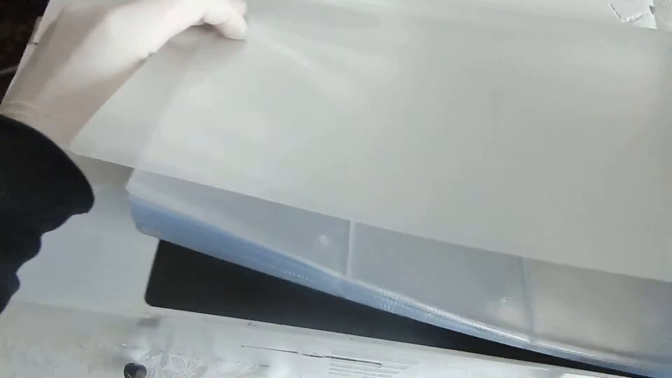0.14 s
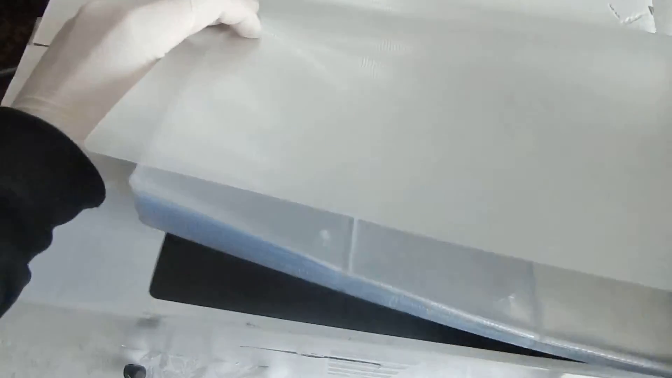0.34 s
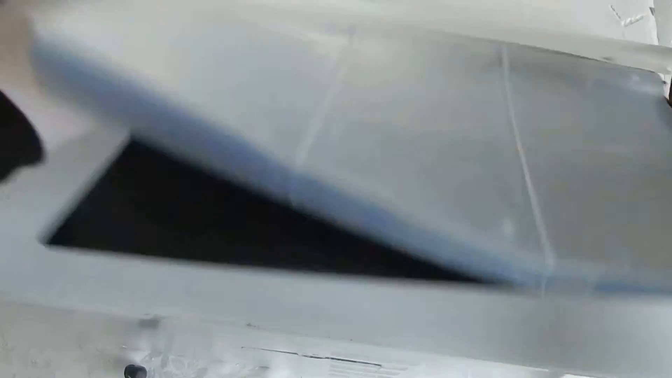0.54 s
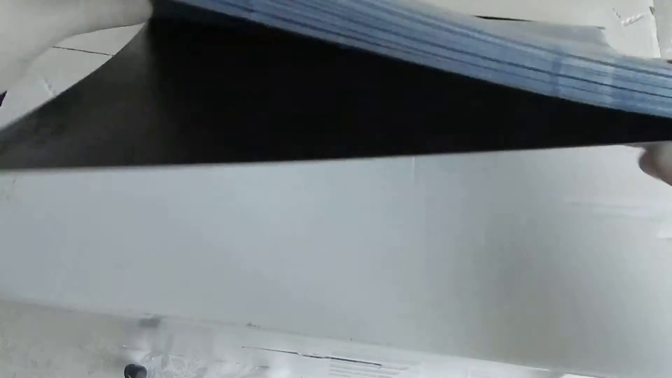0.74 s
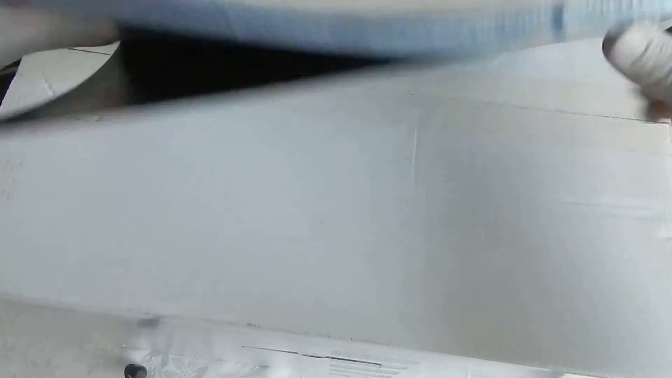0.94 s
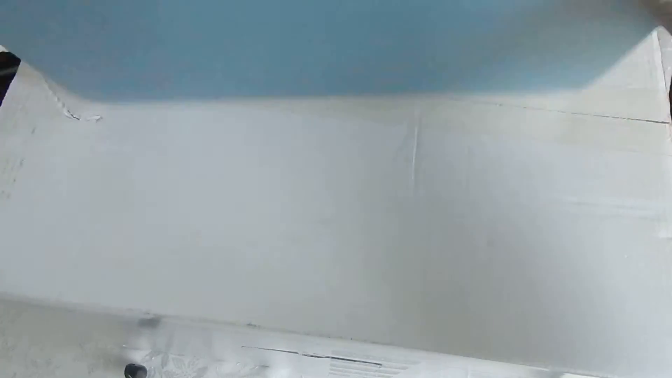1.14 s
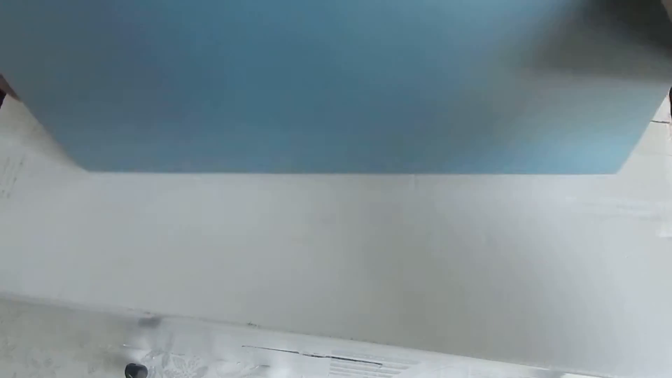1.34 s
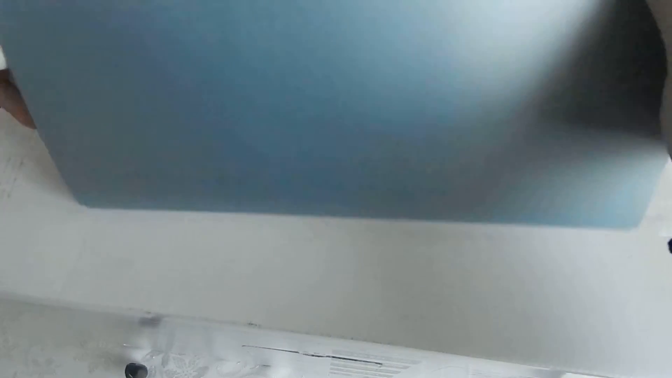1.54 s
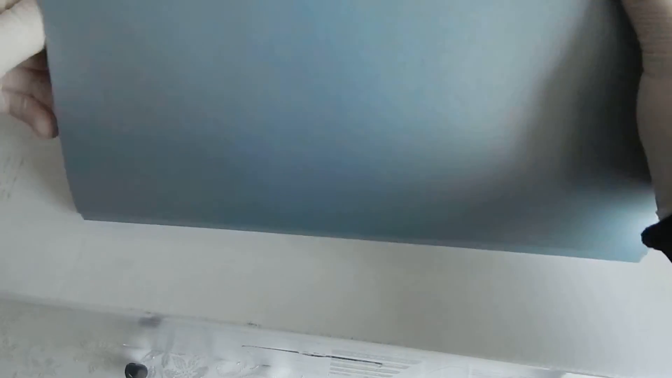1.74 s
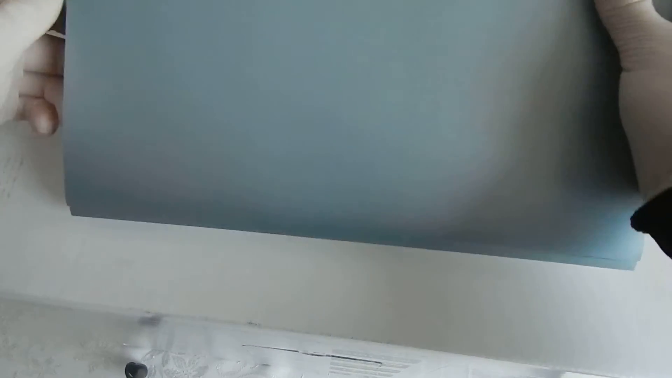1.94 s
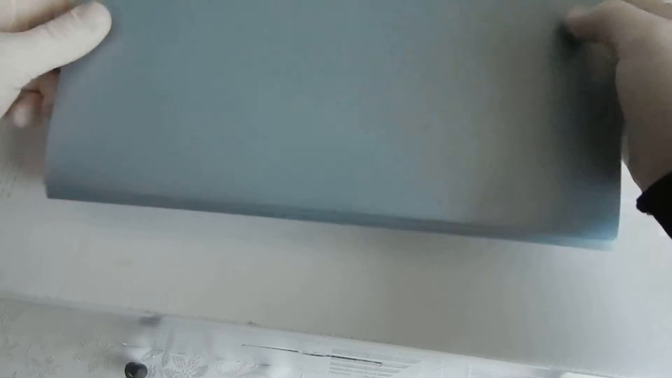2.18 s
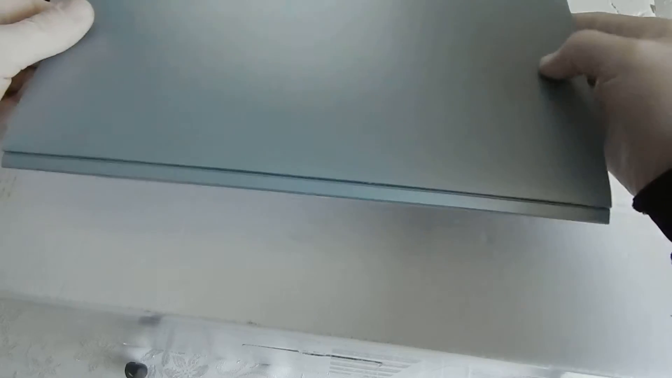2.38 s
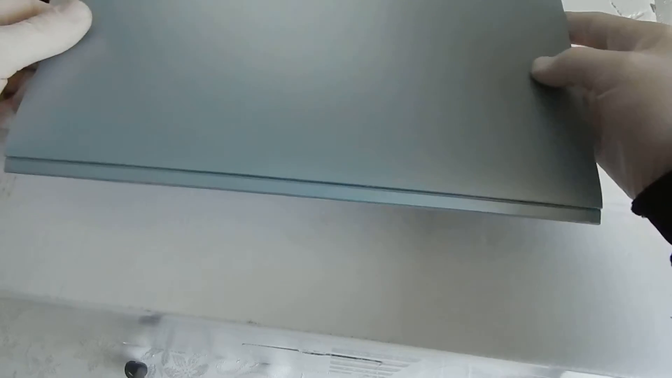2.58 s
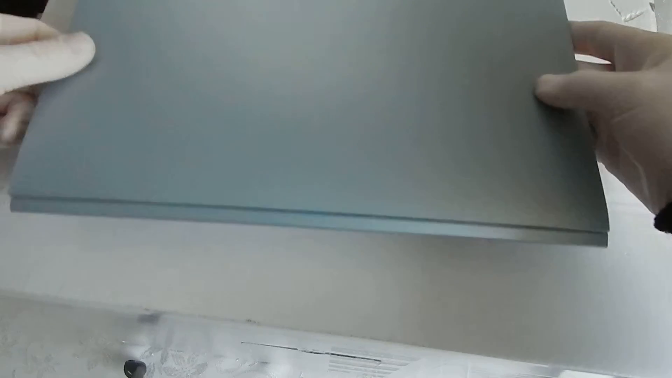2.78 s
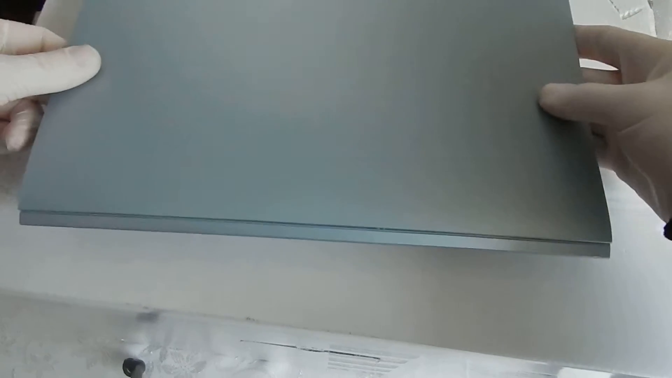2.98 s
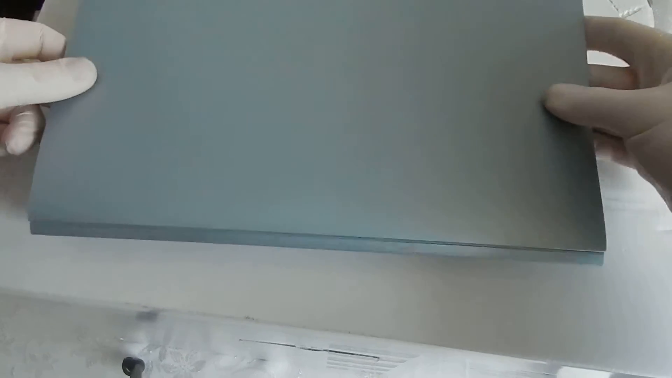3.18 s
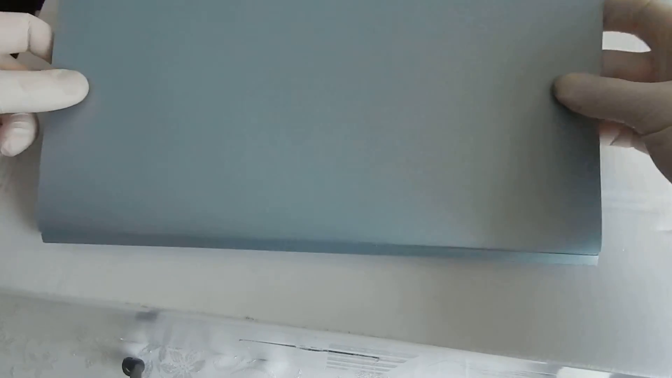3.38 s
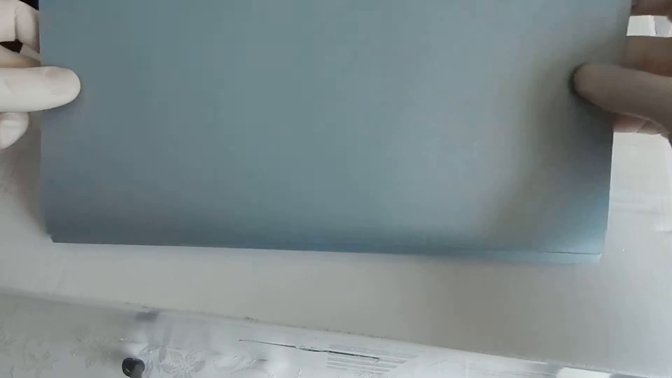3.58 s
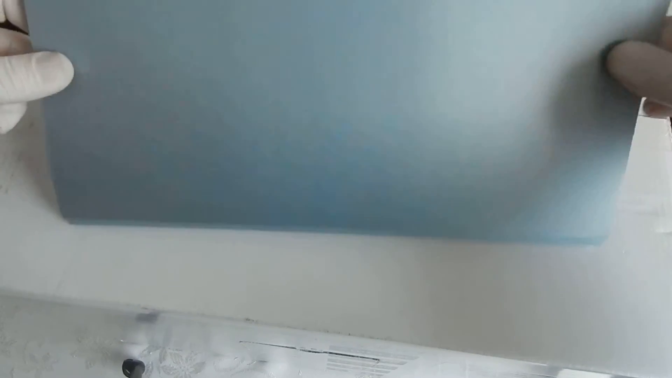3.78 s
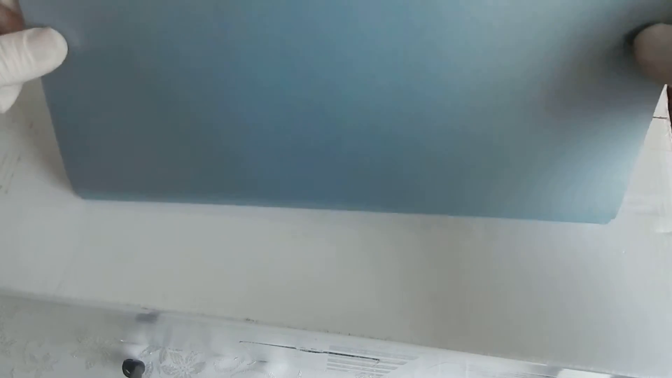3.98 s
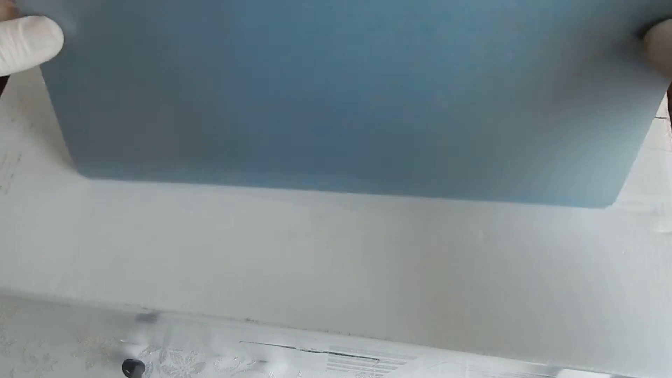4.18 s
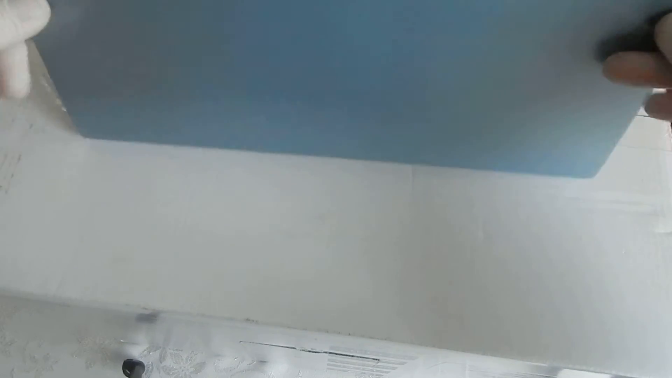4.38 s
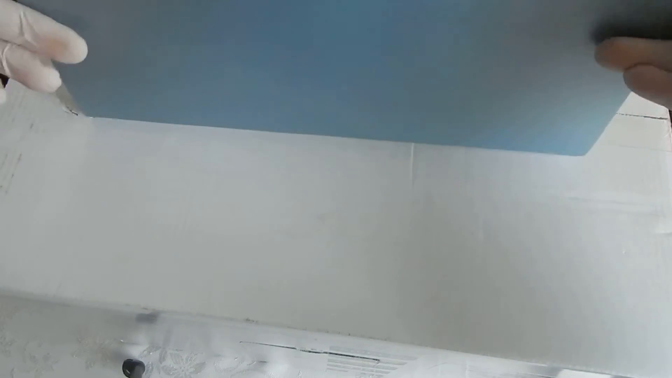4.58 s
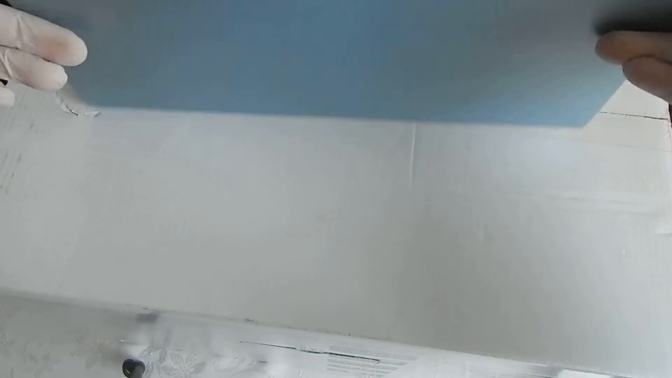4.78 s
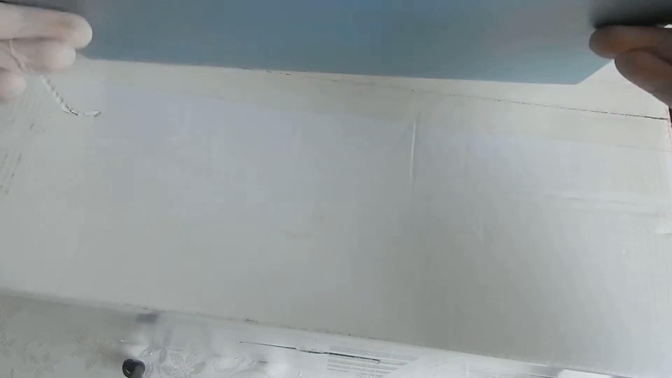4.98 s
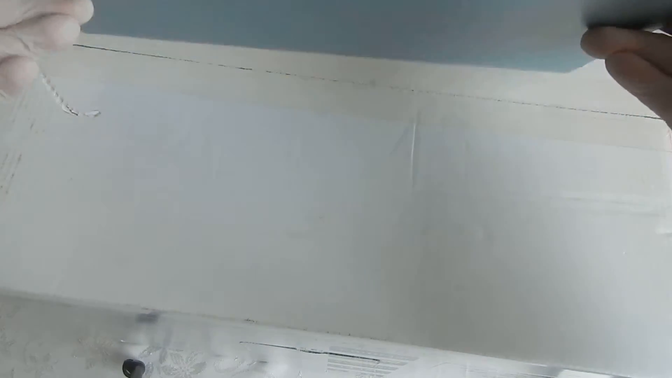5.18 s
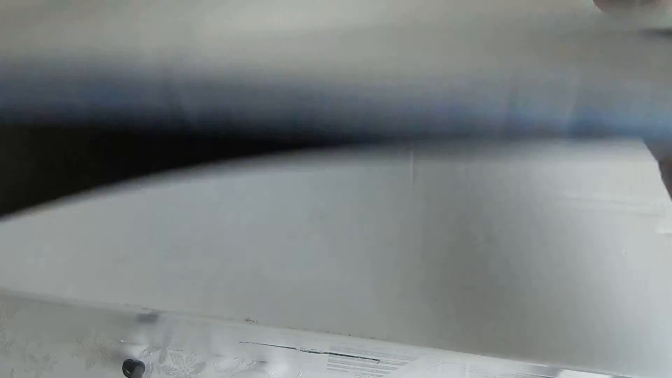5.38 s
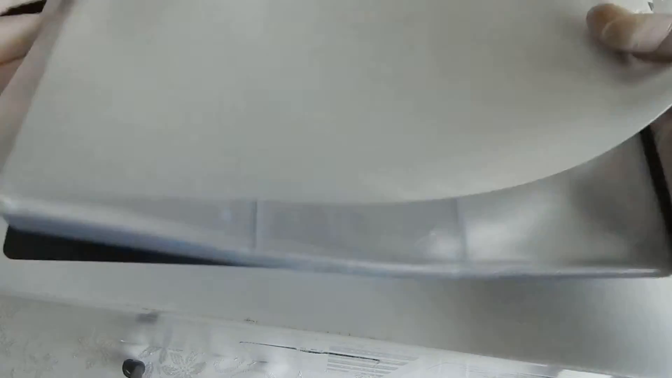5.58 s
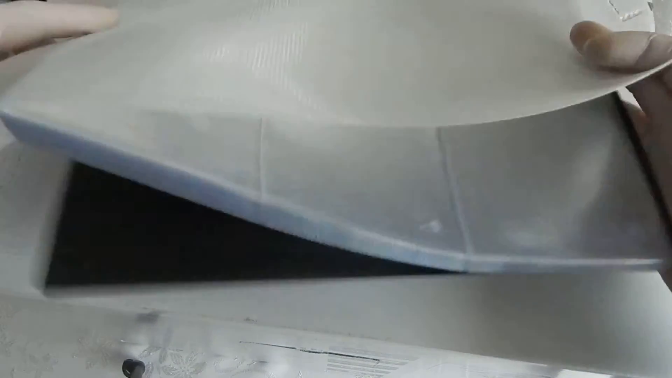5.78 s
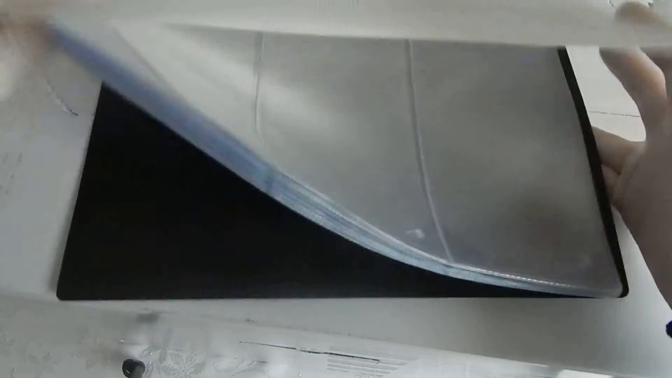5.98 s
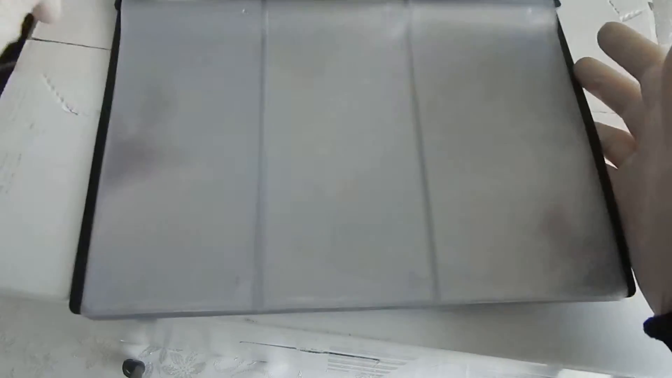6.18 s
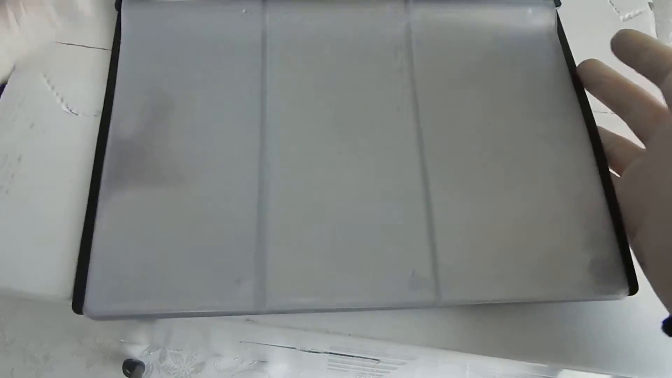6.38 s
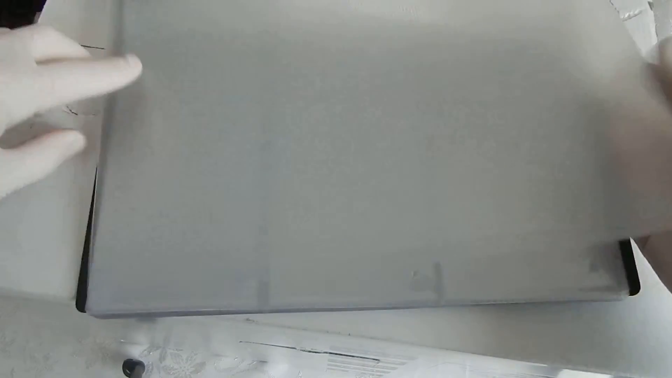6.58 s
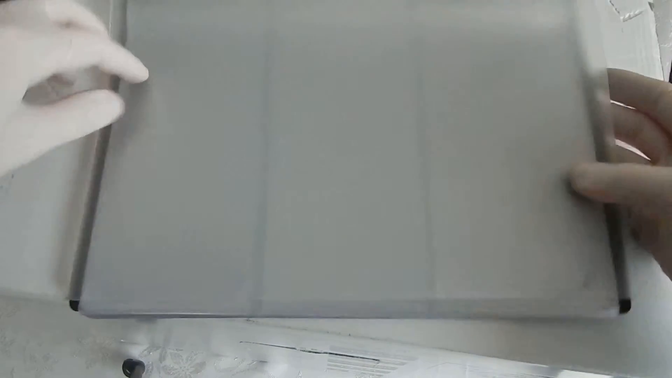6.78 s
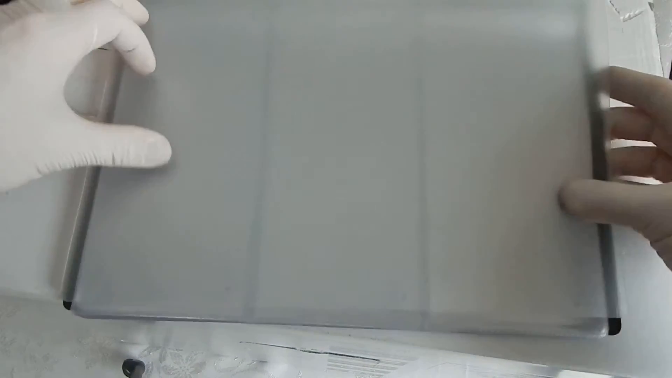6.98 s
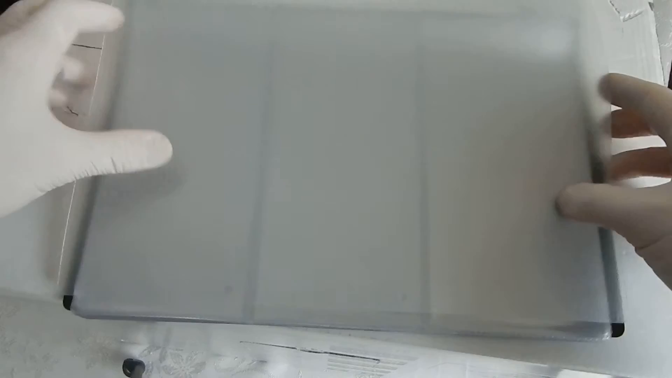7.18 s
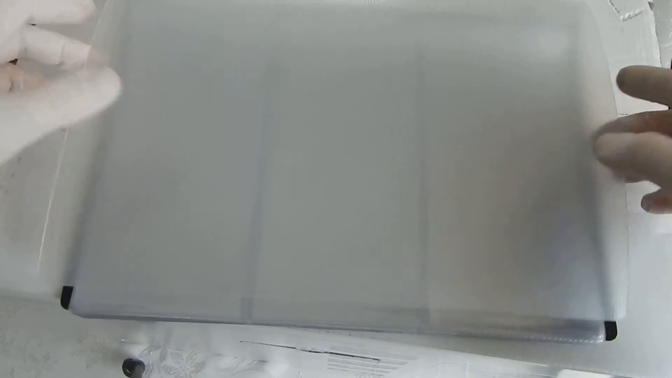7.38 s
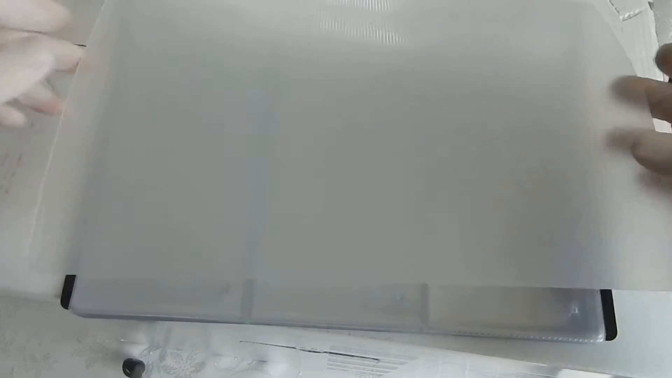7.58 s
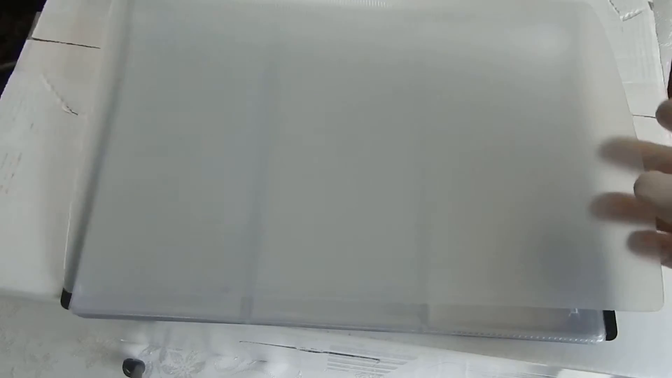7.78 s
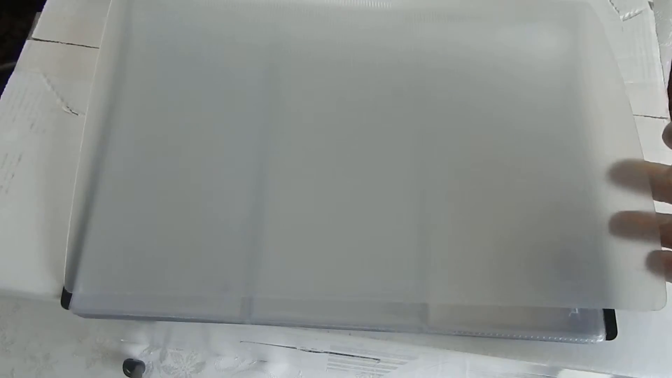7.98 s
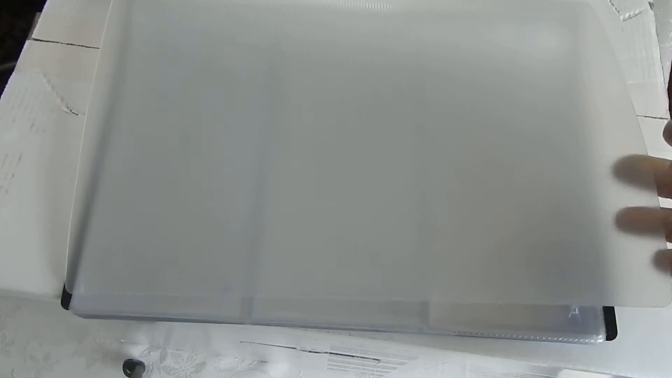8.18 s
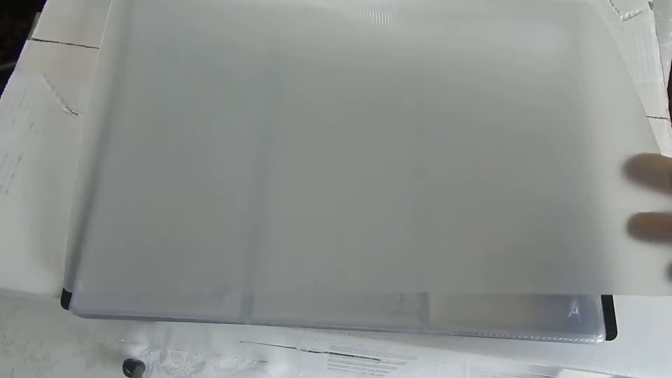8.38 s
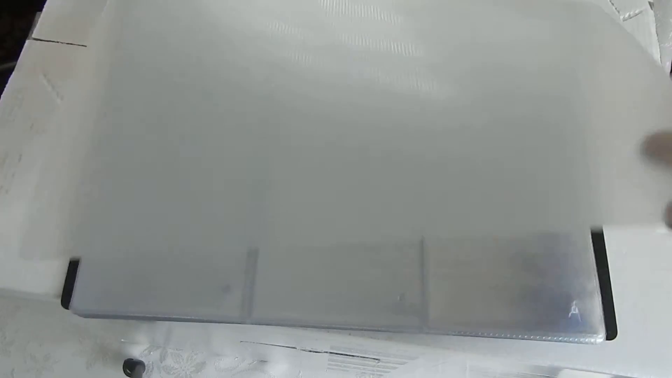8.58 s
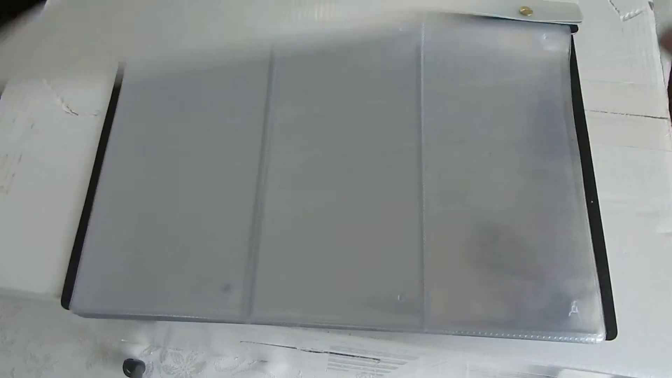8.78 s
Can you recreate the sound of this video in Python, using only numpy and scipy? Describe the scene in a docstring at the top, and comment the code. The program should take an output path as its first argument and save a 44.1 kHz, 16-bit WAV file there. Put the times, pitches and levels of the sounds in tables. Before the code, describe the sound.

Plastic album pages rustle, slap shut and are turned over, then a heavy sheaf drops with a loud thump and sheets are smoothed, indoors.

```python
"""Quiet room air with a faint hum; fingers brush plastic and sheets slide: an album on a table, small room.
Plastic pocket pages are lifted, closed, turned over and opened again. Coloured noise flexes the sheets,
patches of grains rub and crinkle, and small creases pop. Sleeve edges snap as brief scattered contacts.
Landings join a slap of plastic, a clack of cover modes and a thump of the page stack.
Dull echoes and a diffuse stereo tail place the handling in the room."""
import sys
import numpy as np
from scipy import signal
from scipy.fft import rfft, irfft
from scipy.io import wavfile

SR = 44100
rng = np.random.default_rng(int(sys.argv[2]) if len(sys.argv) > 2 else 0)


def unload_wav(signal):
    """Save mono or channel-first audio to the path in sys.argv[1] as 16-bit WAV at rate SR, clipped to [-1, 1]."""
    wavfile.write(
        sys.argv[1],
        SR,
        np.round(np.clip(np.atleast_2d(signal).T, -1, 1) * 32767).astype(np.int16),
    )


N = 390285
TIME = np.arange(N) / SR
AGE = TIME[:SR // 4]   # time since a blow, s

# spectrum of a snapping edge or crease before any tilt: f/Hz, level/dB (relative)
SNAP_SPECTRUM = [(600, -8), (1500, 2.5), (3000, 3.5), (5000, 0), (7000, -2), (10000, 2.5), (13000, -11),
                 (16000, -26)]


def from_db(db):
    """Decibels to gain."""
    return 10 ** (np.asarray(db) / 20)


def rms_one(x):
    """Scale to rms 1."""
    return x / np.sqrt(np.mean(x ** 2) + 1e-20)


def unit_blow(x):
    """Scale a short sound to the energy of rms 1 held for a fixed time."""
    blow_s = .02
    return rms_one(x) * np.sqrt(blow_s * SR / x.shape[-1])


def at_hz(points, hz):
    """Read a table on a log-frequency axis."""
    freq, value = np.transpose(points)
    return np.interp(np.log(hz), np.log(freq), value)


def add(out, s, sound):
    """Mix a sound in at time s, or at the start if s is negative."""
    i = max(0, round(s * SR))
    out[:, i:i + sound.shape[-1]] += sound[..., :N - i]


def pan(db):
    """Left and right gains for a level difference; positive is louder on the left."""
    return from_db(np.array([[db], [-db]]) / 2)


def drift(rate, size=N):
    """Chance values, rate of them per second, joined by straight lines; rms 1."""
    knots = rng.standard_normal(N // 100)
    return rms_one(np.interp(TIME[:size] * rate, np.arange(len(knots)), knots))


def stereo(pair):
    """Two unrelated sounds become left and right: alike in the bass, unlike in the treble."""
    # likeness of the left and right channels: f/Hz, correlation (-1 to 1)
    likeness = [(40, 0.61), (150, 0.83), (500, 0.77), (1000, 0.76), (2000, 0.55), (4000, 0.016),
                (8000, -0.28), (14000, -0.29)]
    size = pair.shape[-1]
    mid, side = rfft(pair)
    alike = np.clip(at_hz(likeness, np.fft.rfftfreq(size, 1 / SR) + 1), -.99, .997)
    left_right = np.sqrt(1 + alike) * mid + np.sqrt(1 - alike) * side * [[1], [-1]]
    return irfft(left_right, size)


def bands(sources):
    """Half-octave stereo bands (Hz, sound), dealt in turn from two pairs of sources."""
    edges_hz = 22 * 2 ** np.arange(0, 10, .5)
    pairs = [stereo(pair) for pair in sources]
    for k, (low, high) in enumerate(zip(edges_hz, edges_hz[1:])):
        band_pass = signal.butter(2, [low, high], "band", fs=SR, output="sos")
        yield np.sqrt(low * high), signal.sosfilt(band_pass, pairs[k % 2])


def texture(spectrum, sources, patchy_db):
    """Coloured stereo sound whose bands flicker independently; rms 1."""
    out = 0
    for hz, band in bands(sources):
        level_db = at_hz(spectrum, hz) + patchy_db * drift(25)
        out = out + band * from_db(level_db)
    return rms_one(out)


def crack(spectrum, decay_s, scatter):
    """One sharp contact and a swell of smaller ones, coloured causally (minimum phase)."""
    size = len(AGE)
    log_gain = np.log(from_db(at_hz(spectrum, np.fft.rfftfreq(size, 1 / SR) + 1)))
    # folding the cepstrum onto positive times keeps the colour from sounding before the contact
    fold = np.r_[1, np.full(size // 2, 2), np.zeros(size - size // 2 - 1)]
    colour = np.exp(rfft(irfft(log_gain, size) * fold))
    contacts = stereo(rng.standard_normal((2, size))) * np.sqrt(AGE) * np.exp(-AGE / decay_s)
    contacts = scatter * rms_one(contacts) / np.sqrt(size)
    contacts[1, 0] += 1   # the sharp contact reaches the right channel first
    contacts[0, 3] += 1   # and the left three samples later
    return unit_blow(irfft(rfft(contacts) * colour, size))


def background(noise_db=-62, hum_hz=90, hum_db=-67):
    """Quiet room air is coloured noise; a faint sine hum wavers in level and phase."""
    # spectrum of the room air: f/Hz, level/dB (relative)
    air_spectrum = [(25, 1), (50, -27), (90, 11), (125, -22.5), (250, -14), (600, -11.5), (1500, -18),
                    (3000, -23), (5000, -25.5), (10000, -29), (16000, -46)]
    waver_db, waver_rad, waver_per_s = 3.5, 1.2, 4
    hum_level = from_db(hum_db + waver_db * drift(waver_per_s))
    hum = hum_level * np.sin(2 * np.pi * hum_hz * TIME + waver_rad * drift(waver_per_s))
    air = texture(air_spectrum, rng.standard_normal((2, 2, N)), patchy_db=-0.3)
    return hum + from_db(noise_db) * air


def slide_levels():
    """Flexing, rubbing and crinkling dB: each move swells, holds and dies away over faint holding."""
    # sheets sliding over each other, one row per move of the hands:
    # t/s, length/s, then flexing, rubbing and crinkling level/dB (before layer gains).
    # A sheet is drawn up, the stack gripped, the pages swing over and fall shut; the closed album is
    # tipped forward, the grip changes, hands slide along the cover, and the album is tipped back.
    # Fingers find the cover and open it; the stack bends and the sheaf slips off the thumb.
    # A sheet is laid back and smoothed; the hand glides to its edge, picks it up, and the sheet lifts.
    moves = [(-.05, .12, -58, -47.5, -53.5), (0.228, 0.077, -47, -49, -56.5), (0.557, 0.2, -48.5, -48, -55),
             (0.81, 0.38, -51, -49, -62), (1.495, 0.29, -70, -62.5, -68), (2.02, 0.32, -83, -59.5, -68),
             (3.59, 0.19, -64, -62.5, -106), (4.313, 0.3, -53, -52.5, -65),
             (4.756, 0.28, -61.5, -59.5, -69.5), (5.38, 0.38, -58, -54.5, -59.5),
             (5.766, 0.11, -40, -44.5, -59), (5.983, 0.013, -50, -35, -50),
             (6.498, 0.41, -53.5, -57, -62.5), (7.15, 0.17, -58.5, -51, -64.5),
             (7.912, 0.15, -56.5, -56.5, -51.5), (8.325, 0.18, -53.5, -61, -64),
             (8.744, 0.046, -57.5, -60.5, -60.5)]
    # the album only held: flexing, rubbing and crinkling level/dB (before layer gains)
    holding_db = (-60.5, -64, -73.5)
    attack_s, release_s = 0.067, 0.075   # time constants of every move
    power = from_db(holding_db)[:, None] ** 2 * np.ones(N)
    for start, length, *levels_db in moves:
        early = np.maximum(start - TIME, 0)
        late = np.maximum(TIME - start - length, 0)
        speed = np.exp(-np.minimum(early / attack_s + late / release_s, 20))
        power = power + (from_db(levels_db)[:, None] * speed) ** 2
    return 10 * np.log10(power)


def grains(per_s, spread_db):
    """Tiny slips of uneven size at random moments."""
    sizes = from_db(spread_db * np.minimum(rng.exponential(1, N), 4))
    slips = rng.random(N) < per_s / SR
    return rms_one(rng.standard_normal((2, 2, N)) * sizes * slips)


def sliding(flex_gain_db=1.0, rub_gain_db=-2.0, crinkle_gain_db=0.0):
    """Bending sheets rumble, their faces rub, and the thin film crinkles in fine grains."""
    # spectra of bending, rubbing and crinkling sheets: f/Hz, level/dB (relative)
    flex_spectrum = [(30, 0.5), (60, 5.5), (110, 5.5), (180, 5.5), (270, -1), (400, -4), (800, -34)]
    rub_spectrum = [(150, -13), (400, -4), (650, 2), (900, 2), (1300, -2), (2300, -7), (3500, -9.5),
                    (5000, -22), (10000, -13), (16000, -29)]
    crinkle_spectrum = [(1000, -5), (3000, 2.5), (5000, 2.5), (7300, -2.5), (9500, 4.5), (11000, -2),
                        (13000, -34), (16000, 0)]
    flex_db, rub_db, crinkle_db = slide_levels()
    grip = drift(45)   # the sheets stick and slip
    flex = texture(flex_spectrum, rng.standard_normal((2, 2, N)), patchy_db=2.5)
    flex = from_db(flex_db + flex_gain_db) * flex
    rub = texture(rub_spectrum, grains(per_s=4000, spread_db=-1.0), patchy_db=1.5)
    rub = from_db(rub_db + rub_gain_db + 1.77 * grip) * rub
    crinkle = texture(crinkle_spectrum, grains(per_s=14000, spread_db=-4.0), patchy_db=-3.0)
    crinkle = from_db(crinkle_db + crinkle_gain_db + 0.55 * grip) * crinkle
    return flex + rub * pan(-0.14) + crinkle * pan(-2.4)


def brushes(slips_per_s=260, rough_db=2.5):
    """Each stroke swells and fades in quick slips, in the pitch range of the patch of sheet that it rubs."""
    # short strokes of fingers and sheet edges over the plastic:
    # t/s, length/s, centre f/Hz, width/octaves, level/dB
    strokes = [(0.0, .26, 870, .9, -55), (0.625, .081, 2300, 1.1, -53.5), (0.957, .059, 3460, 0.59, -53.5),
               (2.332, 0.035, 1580, 0.66, -58.5), (2.641, .22, 1400, 0.33, -69),
               (4.116, 0.085, 10500, 0.58, -60), (4.23, 0.052, 1560, 0.87, -58),
               (4.304, 0.058, 8300, 1.4, -52.5), (4.371, .021, 1680, .6, -55.5),
               (4.567, .08, 9600, 0.51, -50), (4.907, 0.11, 9350, 0.72, -62),
               (5.208, .09, 2430, 0.93, -60.5), (5.717, .33, 2380, 0.82, -49), (5.959, 0.076, 684, .6, -39),
               (6.698, 0.0096, 1600, 0.51, -47.5), (7.178, .035, 1350, 0.17, -49),
               (7.902, 0.38, 8250, 0.84, -62), (8.18, 0.041, 1400, 1.1, -54.5),
               (8.243, 0.087, 255, 0.71, -55)]
    out = np.zeros((2, N))
    for s, length, hz, octaves, db in strokes:
        size = int(length * SR)
        edges_hz = np.clip(hz * 2 ** (octaves * np.array([-1, 1]) / 2), 20, SR * .45)
        band_pass = signal.butter(2, edges_hz, "band", fs=SR, output="sos")
        stroke = signal.sosfilt(band_pass, stereo(rng.standard_normal((2, SR))))
        swell = np.sin(np.linspace(0, np.pi, size)) * from_db(rough_db * drift(slips_per_s, size))
        # the end of the noise is used, where the filter has settled
        add(out, s, from_db(db) * pan(-0.58) * rms_one(stroke[:, -size:] * swell))
    return out


def creases(level_db=-11.0):
    """Small creases pop one by one, louder wherever the sheets rub and crinkle."""
    per_s, spread_db = 38, 4
    _, rub_db, crinkle_db = slide_levels()
    pop_db = (rub_db + crinkle_db) / 2 + level_db + spread_db * rng.uniform(-3.5, 1, N)
    pops = (rng.random(N) < per_s / SR) * from_db(pop_db)
    pop = crack(SNAP_SPECTRUM, decay_s=0.0015, scatter=0.53)
    return pan(-1.2) * signal.fftconvolve(pops[None], pop, axes=1)[:, :N]


def snaps(decay_s=0.0022, scatter=1.5, crispness=0.85):
    """Stiff sleeve edges buckle and flick past each other; a tighter bend snaps brighter and more cleanly."""
    # sleeve edges snapping: t/s, level/dB, left-right/dB, brightness/dB per octave
    flicks = [(.178, -57.5, -12, 7), (0.268, -48, -6, 2), (0.286, -41, -3, 0.5), (0.402, -43.5, -3, 4),
              (.429, -40, -2, 8), (.563, -44.5, -16, 7), (.937, -53.5, 0, 7), (1.003, -47.5, -10, 9),
              (1.176, -42.5, -2, -9.5), (1.518, -54, 1, -3), (2.379, -56, -14, 2.5), (2.465, -60.5, -6, -3),
              (3.285, -66, -7, 12.5), (3.968, -50.5, -6, 2.5), (4.43, -61.5, 12, 10), (4.809, -50.5, 1, -7),
              (5.012, -56.5, -2, 1.5), (5.369, -41, -13.5, 10.5), (5.374, -44.5, -1, 5),
              (5.448, -49, 2, 1.5), (5.486, -50.5, -1, 4), (5.582, -45, 4, -1.5), (5.701, -55, -5, 4),
              (6.01, -35, -1, 1.5), (6.137, -28, -1, -1), (6.749, -40, -5, -2), (6.758, -32.5, -4.5, -8),
              (6.767, -45, -5, 11), (7.122, -47.5, -1, -5.5), (7.254, -47, -6, 3), (7.761, -50.5, 0, 0),
              (8.567, -63, -14, 8)]
    pivot_hz = SNAP_SPECTRUM[0][0]
    out = np.zeros((2, N))
    for s, db, side_db, tilt_db in flicks:
        spectrum = [(hz, level + tilt_db * np.log2(hz / pivot_hz)) for hz, level in SNAP_SPECTRUM]
        snap = crack(spectrum, decay_s, scatter * from_db(-crispness * tilt_db))
        add(out, s, from_db(db) * pan(side_db) * snap)
    return out


def thump(hz, landing_s, cycles, table_hz=75, table_db=-9, table_s=0.0058):
    """The heavy page stack swings for a few cycles; the table gives beneath it."""
    stack = np.sin(2 * np.pi * hz * AGE) * np.exp(-AGE * hz / cycles)
    table = from_db(table_db) * np.sin(2 * np.pi * table_hz * AGE) * np.exp(-AGE / table_s)
    landing = 1 - np.exp(-AGE / landing_s)
    return unit_blow((stack + table) * landing)


def clack(landing_s):
    """The cover's modes, struck by one sheet after another; a slow landing spreads the strikes."""
    # resonances of the covers, each pitch scattered a little per blow: f/Hz, level/dB (relative), t60/s
    cover_modes = [(293.5, 0, 0.036), (398, -3.5, 0.042), (485, -8, 0.03), (595, 1, 0.047),
                   (708, -1, 0.084), (817, 6, 0.018), (898, -12.5, 0.018), (1085, -22.5, 0.14)]
    out = 0
    for hz, db, t60 in cover_modes:
        spread = np.sqrt(AGE) * np.exp(-AGE / (landing_s * 0.98))
        strikes = rms_one(rng.standard_normal(len(AGE)) * spread) / np.sqrt(len(AGE))
        strikes[0] += rng.choice([-1, 1]) * 0.0056 / landing_s   # a quick landing hits harder at first
        mode_hz = hz * (1 + 0.027 * rng.standard_normal())
        mode = np.sin(2 * np.pi * mode_hz * AGE) * from_db(db - 60 * AGE / t60)
        out = out + signal.fftconvolve(strikes, mode)[:len(AGE)]
    return unit_blow(out)


def knocks(thump_gain_db=0.0, clack_gain_db=0.1, slap_gain_db=2.0):
    """Every landing is a slap of plastic, a clack of the cover and a thump of the stack."""
    # album against table and hands: t/s, thump f/Hz, then thump, cover clack and slap level/dB
    # (before layer gains), time over which the sheets land/s
    landings = [(.262, 221, -32.5, -42, -56, 0.014), (.283, 236, -26, -36.5, -56, 0.0066),
                (0.396, 230, -29.5, -43.5, -49, 0.0094), (0.479, 188, -43.5, -53, -47, 0.011),
                (0.563, 144, -40, -38.5, -50, 0.0021), (.856, 214, -46, -43, -55, 0.0019),
                (.981, 158, -45, -39, -47, 0.011), (1.056, 180, -39.5, -67, -71, .002),
                (1.127, 262, -41.5, -44.5, -52, 0.011), (1.159, 180, -33.5, -53, -50, 0.0045),
                (1.174, 181, -28, -33.5, -45, 0.0035), (1.422, 177, -36.5, -47, -55.5, 0.0026),
                (2.26, 148, -68, -50, -60, 0.00054), (2.379, 174, -38.5, -43, -42, 0.0029),
                (3.2863, 195, -41.5, -39, -46.5, 0.0015), (3.517, 264, -67, -52, -68, 0.00087),
                (4.446, 176, -35.5, -44.5, -56.5, 0.0016), (4.762, 176, -37.5, -56, -52.5, 0.0015),
                (4.8, 186, -48, -75, -55.5, 0.0015), (4.899, 176, -38, -54, -51.5, 0.0026),
                (5.016, 178, -52, -47, -57, 0.0048), (5.062, 155, -45, -59, -59.5, .002),
                (5.376, 115, -38.5, -39.5, -51, 0.0032), (5.486, 177, -47.5, -42, -50.5, 0.021),
                (5.582, 305, -57, -37.5, -44, 0.0088), (5.7022, 167, -27.5, -31, -37.5, 0.002),
                (5.768, 266, -21, -30.5, -35, 0.0016), (5.788, 180, -26.5, -38, -47, 0.0068),
                (5.806, 170, -36, -38.5, -54, 0.0022), (6.033, 280, -33, -28, -55, 0.0051),
                (6.076, 303, -32, -41, -56, .004), (6.14, 181, -12.5, -25.5, -36, 0.0043),
                (6.527, 173.5, -37.5, -48, -59, 0.0054), (6.612, 243, -52, -40, -51.5, 0.0041),
                (6.762, 305, -58, -23.5, -33, 0.0056), (7.122, 144, -51, -48.5, -54, 0.0028),
                (7.193, 179, -48, -50, -44.5, 0.0037), (7.233, 262, -39.5, -48, -47, 0.0064),
                (7.255, 226, -30, -36.5, -44, 0.0026), (7.603, 153, -51, -55, -56.5, 0.001),
                (7.761, 161, -49, -42.5, -53, 0.0044), (7.845, 204, -47, -50.5, -49.5, 0.014),
                (8.182, 143, -52, -55, -50, 0.0017), (8.255, 164, -45, -66, -80, 0.0011),
                (8.429, 154, -44.5, -41, -52, 0.017)]
    # spectrum of the plastic slap: f/Hz, level/dB (relative)
    slap_spectrum = [(300, -29.5), (700, -2.5), (1300, 5.5), (2100, -1), (3000, -8.5), (4500, -11.5),
                     (8000, -14.5), (16000, -28.5)]
    # the stack swings longest at its own pitch; pinched or lying loose, it is damped sooner
    stack_hz, stack_cycles, cycles_lost_per_octave = 198, 1.66, 2.1
    out = np.zeros((2, N))
    for s, hz, thump_db, clack_db, slap_db, landing_s in landings:
        cycles = max(.5, stack_cycles - cycles_lost_per_octave * abs(np.log2(hz / stack_hz)))
        slap = pan(-0.88) * crack(slap_spectrum, landing_s * 1.14, scatter=landing_s / 0.0019)
        add(out, s, from_db(thump_db + thump_gain_db) * thump(hz, landing_s, cycles))
        add(out, s, from_db(clack_db + clack_gain_db) * clack(landing_s))
        add(out, s, from_db(slap_db + slap_gain_db) * slap)
    return out


def room(dry, wet_db=-10.0, echo_cut_hz=420):
    """A few dull echoes, and a diffuse tail that builds up quickly and dies soonest in the treble."""
    # decay of the room: f/Hz, t60/s
    room_t60 = [(100, 0.71), (200, 0.56), (700, 0.54), (2000, 0.22), (5000, 0.2), (13000, 0.18)]
    # colour of the room's answer: f/Hz, level/dB (relative)
    room_colour = [(80, -0.5), (180, -12.5), (300, 0.5), (500, -1.5), (1200, -1), (4000, 0.5),
                   (12000, -2.5)]
    # bass echoes between table, ceiling and walls: delay t/s, level/dB
    echoes = [(.0195, -9.5), (.0415, -12.5), (.0525, -15), (.0805, -18.5), (.122, -23.5)]
    age, build_s = TIME[:SR * 3 // 4], .004
    tail = 0
    for hz, band in bands(rng.standard_normal((2, 2, len(age)))):
        build_up = (1 - np.exp(-age / build_s)) ** 2
        dying = band * from_db(-60 * age / at_hz(room_t60, hz)) * build_up
        # wider bands hold more energy
        tail = tail + rms_one(dying) * np.sqrt(hz) * from_db(at_hz(room_colour, hz))
    answer = rms_one(tail) / np.sqrt(len(age))
    out = from_db(wet_db) * signal.fftconvolve(dry, answer, axes=1)[:, :N]
    bass = signal.sosfilt(signal.butter(2, echo_cut_hz, fs=SR, output="sos"), dry)
    for delay, db in echoes:
        add(out, delay, from_db(db) * bass)
    return out


def scene(low_cut_hz=50):
    """Blows and strokes with their room sound, over the sliding sheets and the room air."""
    handling = knocks() + snaps() + brushes() + creases()
    # a small album radiates little deep bass
    handling = signal.sosfilt(signal.butter(1, low_cut_hz, "high", fs=SR, output="sos"), handling)
    return handling + room(handling) + sliding() + background()


def record(dry):
    """A steep elliptic low-pass removes the top of the treble."""
    cutoff_hz = 16000
    return signal.sosfilt(signal.ellip(10, .1, 80, cutoff_hz, fs=SR, output="sos"), dry)


dry = scene()
out = record(dry)
unload_wav(out)
```